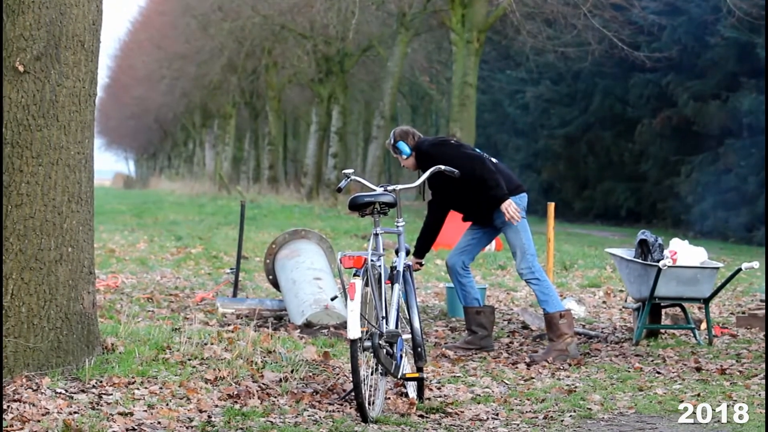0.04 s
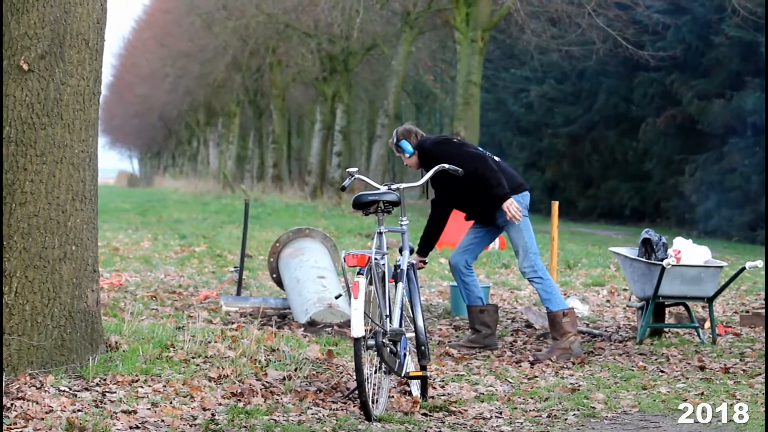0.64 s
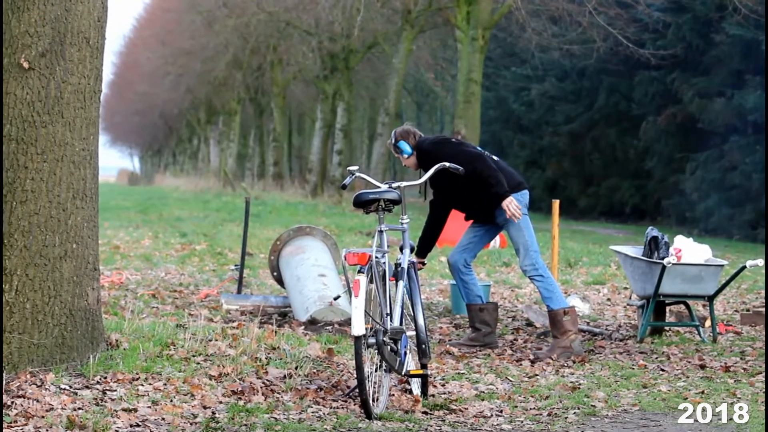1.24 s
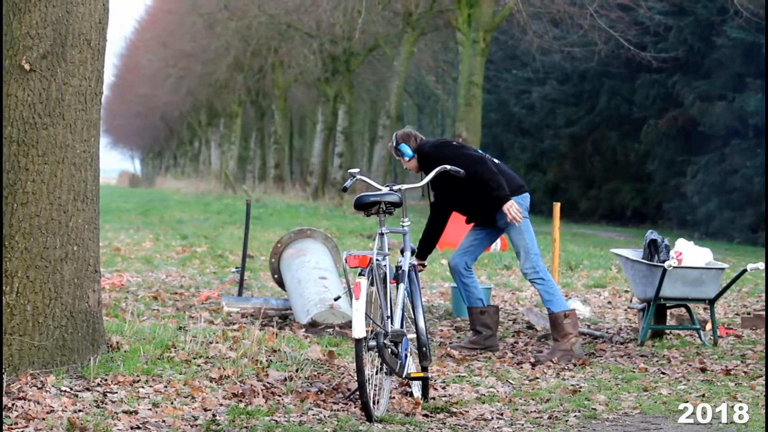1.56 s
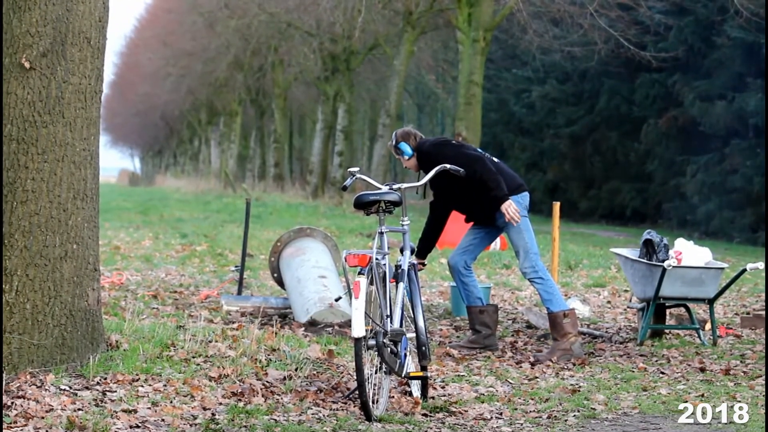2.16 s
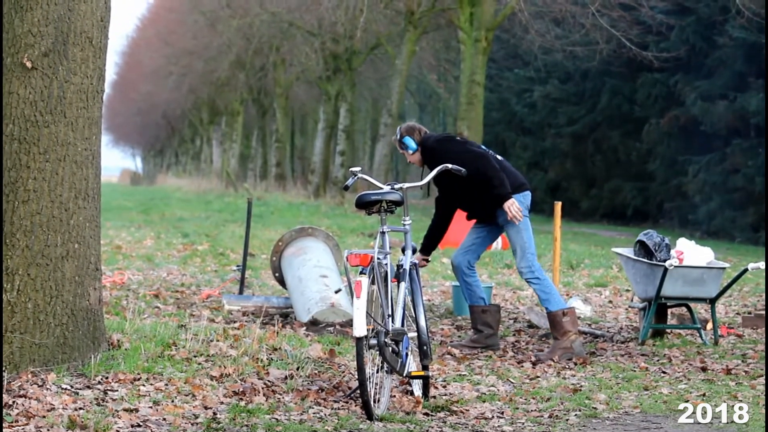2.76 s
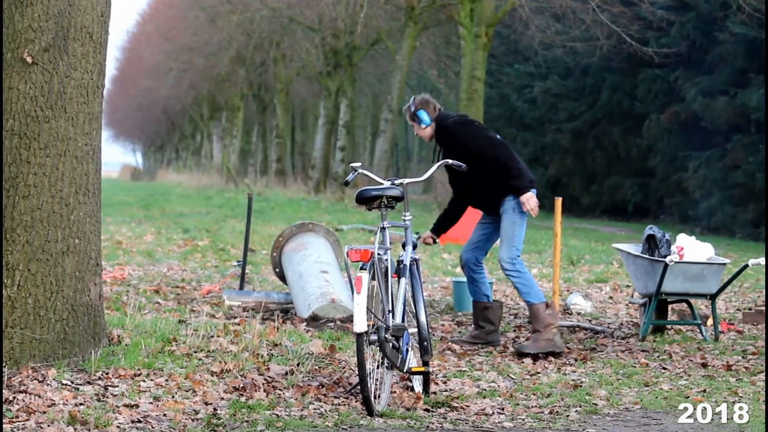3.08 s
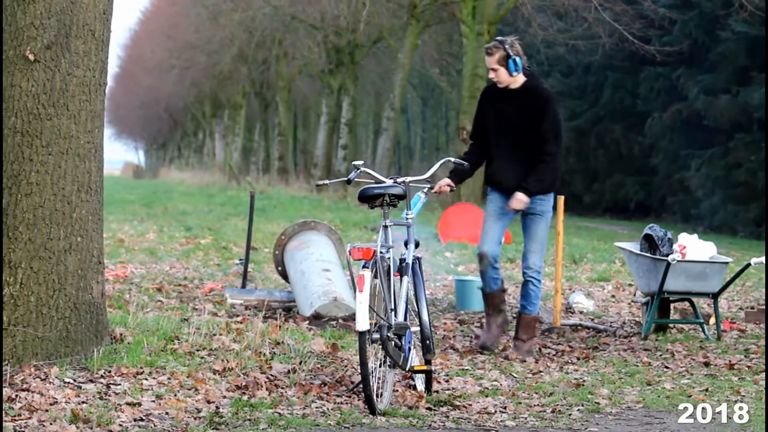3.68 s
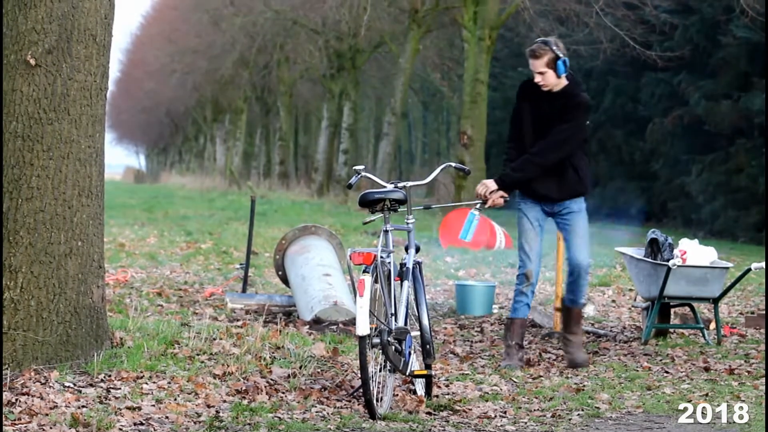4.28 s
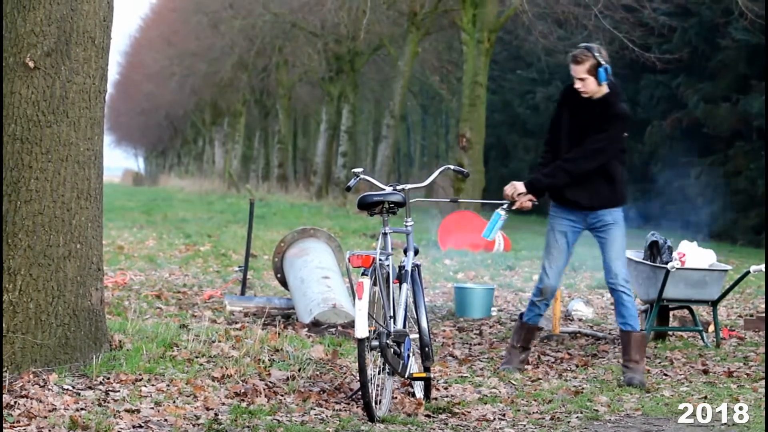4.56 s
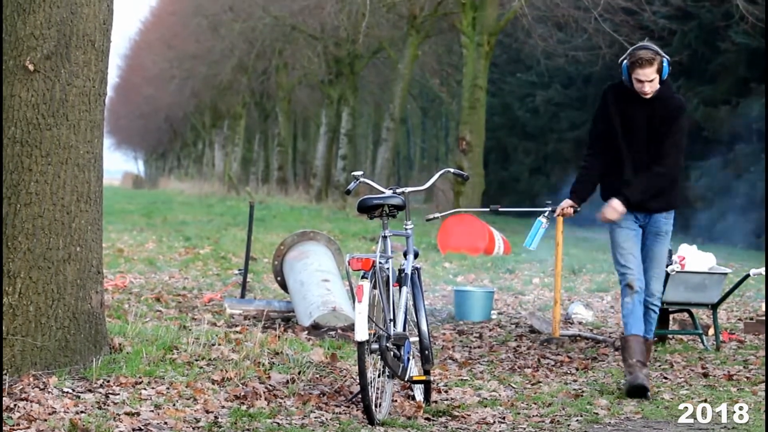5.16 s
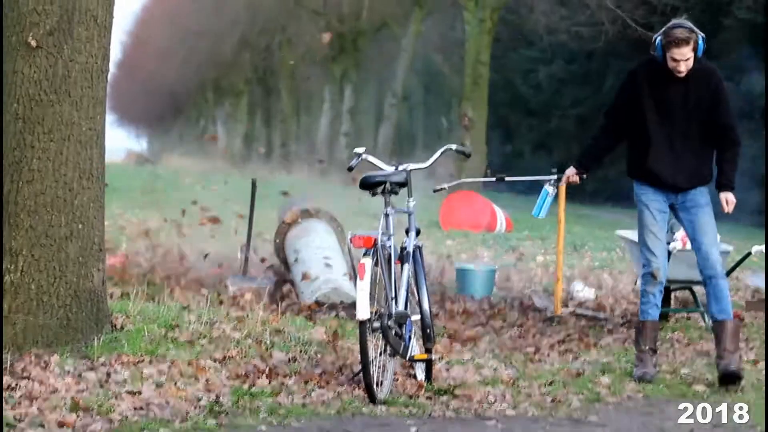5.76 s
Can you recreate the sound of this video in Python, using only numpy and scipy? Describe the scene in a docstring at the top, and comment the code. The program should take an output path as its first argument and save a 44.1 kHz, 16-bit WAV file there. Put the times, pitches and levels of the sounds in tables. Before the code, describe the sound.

In an open field, a faint distant hum and the hiss of trees give way to uneven gusts that thump and rasp on the microphone. Dry leaves rustle faintly under boots. Near the end, burning gas hisses briefly from a milk churn and the lid blows off with a very loud bang, overloading the microphone into a popping, sputtering roar.

```python
"""An open, windy field strewn with dry leaves: a carbide shot from a milk churn.
Gusts buffet the microphone; after each hard one the gain control ducks the far hum and the hiss
of trees, which swell back. Leaves rustle underfoot. Then flame jets from the churn, the lid
blows off, and the pressure wave chokes the microphone into a sputter."""
import sys
import numpy as np
from scipy import signal
from scipy.fft import rfft, irfft, next_fast_len
from scipy.io import wavfile
from scipy.ndimage import uniform_filter1d

SR = 44100
rng = np.random.default_rng(int(sys.argv[2]) if len(sys.argv) > 2 else 0)


def waveform_to_disk(signal):
    """Save audio, clipped to [-1, 1], as 16-bit WAV at the path in sys.argv[1]."""
    frames = np.transpose(np.atleast_2d(signal))
    scaled = np.clip(frames, -1, 1) * 32767
    samples = np.round(scaled).astype(np.int16)
    wavfile.write(sys.argv[1], SR, samples)


N = 257103
TIME = np.arange(N) / SR


def from_db(db):
    """Decibels to gain."""
    return 10 ** (np.asarray(db) / 20)


def rms_one(x):
    """Scale to unit rms."""
    return x / np.sqrt(np.mean(x ** 2) + 1e-20)


def gain_curve(points):
    """Gain from (time [s], level [dB]) points, linear in dB."""
    times_s, levels_db = np.transpose(points)
    return from_db(np.interp(TIME, times_s, levels_db))


def at_hz(points, hz):
    """Interpolate on a log-frequency axis."""
    points_hz, values = np.transpose(points)
    return np.interp(np.log(hz + 1), np.log(points_hz), values)


def cut(x, hz, kind, order=2):
    """Butterworth low- or high-pass."""
    return signal.sosfilt(signal.butter(order, min(hz, .45 * SR), kind, fs=SR, output="sos"), x + 1e-18)


def envelope(start_s, rise_s, length_s=N / SR, release_s=1, sag_db_per_s=0, time=TIME):
    """Linear attack, a hold that may sag, exponential release."""
    age_s = np.maximum(time - start_s, 0)
    release = np.exp(-np.minimum(np.maximum(age_s - length_s, 0) / release_s, 20))
    return np.minimum(age_s / rise_s, 1) * from_db(-sag_db_per_s * age_s) * release


def drift(hz):
    """Low-passed noise, unit rms."""
    return rms_one(cut(rng.standard_normal(N + SR // 4), hz, "low")[-N:])


def flutter(depth_db, rate_hz):
    """Randomly wavering gain."""
    return from_db(depth_db * drift(rate_hz))


def stereo_noise(spectrum):
    """Coloured noise at two closely spaced microphone ports, unit rms."""
    # likeness of the ports: (frequency [Hz], correlation [0..1])
    coherence = [(100, .999), (1000, .995), (4000, .999), (8000, .999), (11000, .99), (13000, .66)]
    size = next_fast_len(N)
    hz = np.arange(size // 2 + 1) * SR / size
    alike = np.clip(at_hz(coherence, hz), 0, 1)
    mid, side = rfft(rng.standard_normal((2, size))) * from_db(at_hz(spectrum, hz))
    ports = np.sqrt(1 + alike) * mid + np.sqrt(1 - alike) * side * [[1], [-1]]
    return rms_one(irfft(ports, size)[:, :N])


def far_rumble(level_db=-49):
    """Steady, distant low noise."""
    # rumble spectrum: (frequency [Hz], relative density [dB])
    spectrum = [(18, -17), (35, -1), (70, 9), (110, -3), (200, -11), (400, -42), (1000, -91)]
    return from_db(level_db) * stereo_noise(spectrum)


def far_hum():
    """A distant hum wavers and slowly recedes."""
    # hum spectrum: (frequency [Hz], relative density [dB])
    spectrum = [(53, -50), (90, -29), (182, -33), (269, -6.5), (297, -21.5), (333, -5.5), (393, -13.5),
                (582, -10), (652, -14.5), (756, -8), (1010, -10), (1250, -3), (1700, -11), (2150, -17.5),
                (2990, -18.5), (4500, -32.5), (5850, -44), (9900, -120)]
    # hum loudness: (time [s], level [dB])
    levels = [(0, -34.5), (.95, -35), (1.5, -38), (1.85, -37), (3, -36.5), (4, -39), (5.3, -43.5)]
    return gain_curve(levels) * flutter(depth_db=0.87, rate_hz=26) * stereo_noise(spectrum)


def trees():
    """Wind hisses in the trees."""
    # hiss spectrum: (frequency [Hz], relative density [dB])
    spectrum = [(1500, -8), (2600, 4.5), (3300, 1.5), (4500, 0.5), (7500, 0.5), (9500, -4), (11500, -11),
                (13000, -22), (14500, -46)]
    # hiss loudness: (time [s], level [dB])
    levels = [(0, -47.5), (.8, -46.5), (1.4, -47), (2.4, -45.5), (3.3, -46), (3.95, -45), (4.4, -48.5),
              (5.3, -48.5)]
    return gain_curve(levels) * flutter(depth_db=1.44, rate_hz=22) * stereo_noise(spectrum)


def soft_rush():
    """A soft rush swells, then fades as the first gusts arrive."""
    # rush spectrum: (frequency [Hz], relative density [dB])
    spectrum = [(900, -25.5), (1800, 8), (2900, -3.5), (3700, -2.5), (5000, -26), (9000, -52)]
    # rush loudness: (time [s], level [dB])
    levels = [(0, -66), (.5, -45.5), (.95, -42.5), (1.25, -57), (1.6, -68.5)]
    return gain_curve(levels) * stereo_noise(spectrum)


def leaves(grain_db=4.0, band_ratio=1.56):
    """Each shift of a boot crushes dry leaves into a short, grainy rustle with its own pitch."""
    # boot shifts: (time [s], level [dB], fade [s], centre [Hz])
    rustles = [(.502, -36.5, .012, 4500), (.929, -40, .009, 6000), (1.408, -45, .012, 10000),
               (1.542, -42, .008, 8000), (1.753, -34, 0.0071, 10500), (1.834, -37, 0.028, 5500),
               (2.721, -31, 0.03, 3420), (2.817, -32, 0.034, 4400), (3.785, -34, 0.006, 6500),
               (5.186, -42, 0.02, 5000), (5.275, -41.5, 0.044, 6500), (5.338, -32.5, 0.042, 4740)]
    # leaf spectrum: (frequency [Hz], relative density [dB])
    spectrum = [(1200, -5), (3000, 6), (6500, 0), (11500, -3), (14000, -38)]
    grains = flutter(grain_db, rate_hz=400) * stereo_noise(spectrum)
    out = np.zeros((2, N))
    for start_s, level_db, fade_s, hz in rustles:
        near = slice(int(start_s * SR), int((start_s + 10 * fade_s) * SR))
        age = np.maximum(TIME[near] - start_s, 0) / fade_s
        band = cut(cut(grains[:, near], hz / band_ratio, "high"), hz * band_ratio, "low")
        out[:, near] += from_db(level_db) * np.exp(-age) * (1 - np.exp(-5 * age)) * rms_one(band)
    return out


def turbulence(edge_hz, lump_db=3.5, slope=3.91, low_cut_hz=131, top_hz=2220, bypass_db=-33.5):
    """Lumpy pressure noise at unit running rms; stronger lumps reach higher in frequency."""
    lumps = flutter(lump_db, rate_hz=101.6)
    corner_hz = edge_hz * lumps ** 0.38
    white = rng.standard_normal((2, N))
    bands_hz = np.geomspace(30, 3840, 15)
    noise = 0
    for k, (low_hz, high_hz) in enumerate(zip(bands_hz, bands_hz[1:])):
        bandpass = signal.butter(2, [low_hz, high_hz], "band", fs=SR, output="sos")
        rolloff = 1 + (np.sqrt(low_hz * high_hz) / corner_hz) ** slope
        noise = noise + signal.sosfilt(bandpass, white[k % 2]) / rolloff
    pressure = cut(cut(noise * lumps, low_cut_hz, "high"), top_hz, "low", order=4)
    pressure += from_db(bypass_db) * noise
    return pressure / np.sqrt(uniform_filter1d(pressure ** 2, size=800) + 1e-12)


def with_eddies(flow, crack_s=0.0011, crack_low_hz=950, crack_top_hz=2600):
    """Each eddy displaces the flow with one push and pull; some break with a dry crack. The last thump comes as
    the flame bursts from the churn."""
    # thumps on the microphone, the last as the flame bursts out: (time [s], level [dB], pitch [Hz], crack re
    # thump [dB])
    eddies = [(0.426, -29.5, 110, -41), (1.049, -6.5, 330, -37), (1.108, -6.5, 300, -36),
              (1.121, -3.5, 315, -37), (1.139, -9.5, 597, -35), (1.237, -4.5, 293, -36),
              (1.279, -0.5, 348, -39), (1.2941, 1.5, 410, -39), (1.3145, -4, 500, -33),
              (1.3369, 5, 340, -35), (1.4262, 2, 260, -50), (1.5141, -0.5, 290.0, -42),
              (1.731, -3.5, 256, -41), (1.913, 2.5, 393, -39.5), (1.9771, 4, 505.0, -45),
              (2.0426, 5, 476, -18), (2.059, 3, 400, -28), (2.2274, 7.5, 438, -23),
              (2.242, 9.5, 440.0, -30), (2.3091, 3.5, 700, -24), (2.346, 2, 300, -40),
              (2.4221, -0.5, 524, -21), (2.471, 5.5, 444, -42), (2.5222, 14, 500, -26),
              (2.543, 5, 560, -18.5), (2.7118, 2, 547, -28), (2.946, -1, 450, -33.5), (2.965, -3, 480, -25),
              (3.03, 2.5, 477.0, -19), (3.0595, 13.5, 555, -36), (3.208, 13.5, 273, -47),
              (3.37, -10, 600, -30), (3.471, -8, 420, -34), (3.64, -9, 560, -30), (3.8472, 3, 367, -31),
              (3.884, -3, 400, -34), (3.894, -4, 400, -34), (4.1077, 10, 300, -21), (4.1238, 6.5, 410, -9),
              (4.13, 7, 300, -15), (4.1433, 10, 260, -45), (4.2113, 10.5, 534, -47), (4.2512, 8, 370, -32),
              (4.409, -2.5, 480, -31), (4.555, -1.5, 385, -23.5), (4.6351, 0, 327, -37),
              (4.6734, -2, 312, -38), (4.8114, 1, 550, -33), (4.829, -3, 399, -42), (4.873, 2, 317, -45),
              (4.902, -5.5, 400, -36), (4.9906, 4.5, 328, -38), (5.271, -6, 220, -45),
              (5.332, -6, 260, -27), (5.355, -6, 240, -42), (5.418, -8.5, 390, -33)]
    out, crack = flow.copy(), np.zeros(N)
    for centre_s, level_db, hz, crack_db in eddies:
        near = slice(int((centre_s - .03) * SR), int((centre_s + .03) * SR))
        since_s = TIME[near] - centre_s
        core = np.exp(-(since_s * hz / 0.47) ** 2)
        thump = from_db(level_db) * core * np.cos(2 * np.pi * since_s * hz - .9)
        out[near] = out[near] * (1 - 0.58 * core) + thump
        crack[near] += from_db(level_db + crack_db) * np.exp(-(since_s / crack_s) ** 2)
    grit = cut(cut(rng.standard_normal(N), crack_low_hz, "high"), crack_top_hz, "low", order=6)
    return out + crack * rms_one(grit)


def rasp(flow, rise_s=0.0034, release_s=0.0026):
    """The hardest gusts overload the microphone: grit bursts out with every swing."""
    # overloads: (time [s], length [s], level [dB])
    overloads = [(2.03, 0.015, -17), (2.211, 0.036, -24), (2.303, 0.0065, -23), (2.404, 0.015, -22.5),
                 (2.484, .014, -29), (2.517, 0.032, -25), (3.01, 0.0513, -24.5), (4.099, 0.016, -15.5),
                 (4.122, 0.0056, -16.5), (4.245, 0.013, -25.5)]
    # grit spectrum: (frequency [Hz], relative density [dB])
    spectrum = [(500, -17), (1000, 8), (1600, 11), (2600, -11), (4000, -16.5), (6000, -24), (10000, -52)]
    strain = sum(from_db(level_db) * envelope(start_s, rise_s, length_s, release_s)
                 for start_s, length_s, level_db in overloads)
    swings = abs(flow) / np.sqrt(uniform_filter1d(flow ** 2, size=600) + 1e-10)
    return strain * swings * stereo_noise(spectrum)


def wind(breeze_edge_hz=300, rise_s=0.0092, release_s=0.0059):
    """Gusts and eddies ride on a breeze; the stronger of gust and breeze sets the brightness."""
    # light wind between gusts: (time [s], level [dB])
    breeze = [(0.82, -47), (0.92, -35), (1.0, -23), (1.14, -21), (1.66, -30.5), (1.88, -20.5), (2.46, -14),
              (2.57, -28.5), (3.0, -16), (3.27, -29.5), (3.42, -18), (3.56, -36.5), (3.7, -25), (4.34, -29),
              (4.48, -24), (5.08, -29), (5.25, -23), (5.39, -35)]
    # gusts on the microphone: (time [s], length [s], level [dB], upper edge [Hz])
    gusts = [(1.082, 0.03, -16, 257), (1.229, 0.013, -13, 330.0), (1.26, 0.054, -12, 430),
             (1.331, 0.054, -13.5, 321), (1.405, 0.035, -10.5, 333), (1.455, 0.07, -14, 380),
             (1.564, 0.046, -18.5, 246), (1.618, 0.012, -17.5, 330), (1.701, 0.26, -16.5, 340),
             (1.903, 0.034, -7, 450), (1.945, 0.032, -12.5, 535), (2.013, 0.01, -4.5, 560),
             (2.03, 0.028, -2.5, 595), (2.078, 0.025, -11.5, 680), (2.111, 0.065, -11.5, 350),
             (2.205, 0.041, -1.5, 497), (2.271, 0.02, -10.5, 540), (2.298, 0.07, -8, 470),
             (2.394, 0.045, -8, 510), (2.456, 0.064, -8.5, 537), (2.507, 0.04, -2, 815),
             (2.619, 0.034, -11, 480), (2.668, 0.05, -9.5, 670), (2.737, 0.059, -12.5, 557),
             (2.933, 0.039, -10.5, 600), (3.007, 0.015, -12, 400), (3.018, 0.063, -1.5, 830),
             (3.108, 0.0093, -10, 380.0), (3.145, 0.011, -10.5, 350.0), (3.289, 0.013, -13.5, 635),
             (3.345, 0.05, -13.5, 603), (3.412, 0.032, -16, 680), (3.46, 0.026, -15, 590),
             (3.609, 0.048, -16, 460), (3.672, .014, -19, 480), (3.836, 0.02, -15.5, 440),
             (3.869, 0.037, -13.5, 417), (3.984, 0.069, -18.5, 316), (4.089, 0.079, -3.5, 410),
             (4.141, 0.06, -3.5, 407), (4.206, 0.0087, 0.5, 620), (4.225, 0.048, -6, 432),
             (4.4, 0.0093, -10.5, 590), (4.458, 0.029, -16.5, 380.0), (4.543, 0.038, -12.0, 476),
             (4.623, 0.055, -17.5, 322), (4.783, 0.07, -12, 534), (4.865, 0.047, -14.5, 316),
             (4.926, 0.035, -17, 370), (4.983, 0.013, -8, 570), (5.153, 0.035, -23.5, 516),
             (5.202, 0.029, -17, 473), (5.254, 0.043, -13, 292), (5.319, 0.055, -15, 272)]
    power = (gain_curve(breeze) * flutter(depth_db=3.5, rate_hz=18)) ** 2
    weighted_edge = power * breeze_edge_hz
    for start_s, length_s, level_db, edge_hz in gusts:
        near = slice(int(start_s * SR), int((start_s + length_s + 10 * release_s) * SR))
        gust = from_db(level_db) * envelope(start_s, rise_s, length_s, release_s, time=TIME[near])
        power[near] += gust ** 2
        weighted_edge[near] += gust ** 2 * edge_hz
    flow = with_eddies(np.sqrt(power) * turbulence(weighted_edge / power))
    return flow + rasp(flow)


def jet_tones(line_width_hz=3):
    """Many faint, narrow, wavering tones colour the jet's hiss."""
    # tones in the hiss: (frequency [Hz], relative level [dB])
    lines = [(1332, -4), (1765, -3), (1878, -2), (1975, -6), (2314, -3), (2446, -3), (2627, -1), (2974, -6),
             (3221, -3), (3359, -0.5), (3649, -8), (3851, -11), (4266, -5), (4543, -4), (4632, -3),
             (4971, -4), (5571, -3), (5752, -3), (6058, -4), (6648, -5), (6963, -3), (7768, -5), (8088, -1),
             (8419, 3), (8914, 0), (9017, -5), (9488, -2)]
    tones = 0
    for hz, level_db in lines:
        wander_rad = np.cumsum(rng.standard_normal(N)) * np.sqrt(2 * np.pi * line_width_hz / SR)
        tones = tones + from_db(level_db) * np.sin(2 * np.pi * hz * TIME + wander_rad)
    return rms_one(tones)


def flame_jet(seep_s=5.386, burst_s=5.413, release_s=0.03, tones_db=-5):
    """Burning gas seeps from the churn, then bursts out hissing and loses pressure."""
    # flares on top of the sagging jet: (time [s], length [s], level [dB])
    flares = [(5.415, .009, -19), (5.443, 0.028, -15)]
    # gas hiss spectrum: (frequency [Hz], relative density [dB])
    spectrum = [(100, -4), (200, -1), (430, 7), (700, -2), (1000, -9), (1800, -0.5), (3300, 1),
                (6000, -1.5), (8400, 1.5), (10500, -4.5), (12500, -11), (13800, -21), (14500, -45)]
    seep = from_db(-28.5) * envelope(seep_s, rise_s=0.023, length_s=burst_s - seep_s, release_s=release_s)
    burst = from_db(-8.2) * envelope(burst_s, rise_s=0.0066, length_s=0.21, release_s=release_s,
                                     sag_db_per_s=63)
    flare = sum(from_db(level_db) * envelope(start_s, rise_s=.004, length_s=length_s, release_s=.004)
                for start_s, length_s, level_db in flares)
    return (seep + burst + flare) * (from_db(tones_db) * jet_tones() + stereo_noise(spectrum))


def pressure_swings(start_s, rise_s, low_hz=72, top_hz=175, crest_db=20):
    """The blast's slow swings, surging after the bang; 0 dB is the diaphragm's limit."""
    # pressure crests that pin the diaphragm: (time [s], length [s])
    crests = [(5.505, 0.0014), (5.5305, 0.0029), (5.539, .0025), (5.5605, 0.0027), (5.567, 0.0054),
              (5.5732, 0.0033), (5.588, 0.0057), (5.605, 0.0085), (5.641, 0.0028), (5.6785, 0.0023),
              (5.6865, 0.0045), (5.764, 0.0055), (5.782, 0.0029), (5.808, 0.0024)]
    pinned = np.zeros(N)
    for k, (crest_s, length_s) in enumerate(crests):
        pinned[(TIME >= crest_s) & (TIME < crest_s + length_s)] = (-1) ** k
    swell = from_db(0.5) * envelope(start_s, rise_s)
    surge = from_db(10.8) * envelope(5.518, rise_s=0.027, length_s=0.169, release_s=0.0098)
    swings = (swell + surge) * rms_one(cut(drift(top_hz), low_hz, "high"))
    return swings * (1 - abs(pinned)) + from_db(crest_db) * uniform_filter1d(pinned, size=30)


def blast(flame, lid_s=5.4925, lid_rise_s=0.0025, bang_s=5.5019, coupling_hz=290, top_hz=10200):
    """The lid blows off; pressure throws the diaphragm stop to stop, choking roar, bang and flame."""
    # roar spectrum: (frequency [Hz], relative density [dB])
    roar_spectrum = [(80, -7), (200, -20), (700, -1), (1500, -2.5), (2800, -10), (4500, -16.5),
                     (7500, -22.5), (11000, -34), (14000, -29)]
    # bang spectrum: (frequency [Hz], relative density [dB])
    bang_spectrum = [(40, -40), (150, -18), (350, 7), (900, -1.5), (2200, 3), (2900, -2), (3900, 0),
                     (5200, -12), (9000, -16), (13000, -28), (15000, -44)]
    lid = from_db(0.5) * envelope(lid_s, lid_rise_s, length_s=bang_s - lid_s, release_s=0.018)
    roar = from_db(8.5) * envelope(lid_s, lid_rise_s, sag_db_per_s=43.5)
    bang = from_db(13) * envelope(bang_s, rise_s=0.00024, length_s=0.01055, release_s=0.0012,
                                  sag_db_per_s=480)
    tail = from_db(6.5) * envelope(bang_s, rise_s=0.042, sag_db_per_s=17.5)
    pressure = pressure_swings(lid_s, lid_rise_s)
    freedom = np.maximum(1 - np.tanh(pressure / 3) ** 2, from_db(-20))   # leaks even when pinned
    diaphragm = np.tanh(roar * stereo_noise(roar_spectrum) + pressure)
    # the input passes no steady pressure, so each throw becomes a sharp pop
    pops = cut(diaphragm, coupling_hz, "high")
    sputter = cut(pops + from_db(-27) * stereo_noise(roar_spectrum), top_hz, "low", order=8)
    return (lid + tail) * sputter + freedom * (flame + bang * stereo_noise(bang_spectrum))


def gain_control(x, threshold_db=-15, share=0.77, attack_s=0.025, recovery_db_per_s=17, window_s=0.011):
    """Takes back a share of any level over the threshold, then recovers at a steady rate."""
    power = uniform_filter1d(x.mean(axis=0) ** 2, int(window_s * SR))
    level_db = 10 * np.log10(np.maximum(power, 1e-12))
    duck_db = share * np.maximum(level_db - threshold_db, 0)
    recovery_db = recovery_db_per_s * TIME
    held_db = np.maximum.accumulate(duck_db + recovery_db) - recovery_db
    pole = np.exp(-1 / (attack_s * SR))
    return x * from_db(-signal.lfilter([1 - pole], [1, -pole], held_db))


def scene():
    """Wind, field and shot at the microphone."""
    return wind() + far_hum() + trees() + soft_rush() + far_rumble() + leaves() + blast(flame_jet())


def record(dry):
    """The gain control ducks, peaks that outrun it flatten, and the top is cut."""
    cutoff_hz = 14200
    ducked = gain_control(dry)
    clipped = ducked / (1 + ducked ** 8) ** (1 / 8)
    return signal.sosfilt(signal.ellip(10, .1, 70, cutoff_hz, fs=SR, output="sos"), clipped)


dry = scene()
out = record(dry)
waveform_to_disk(out)
```